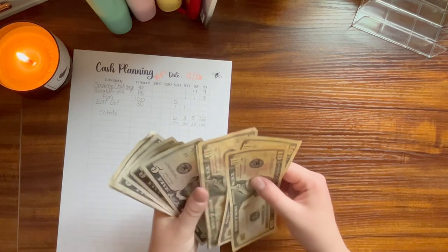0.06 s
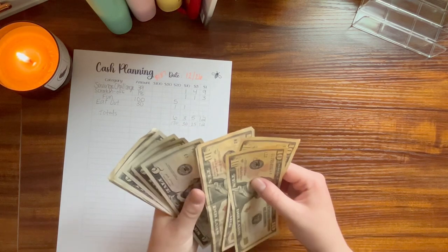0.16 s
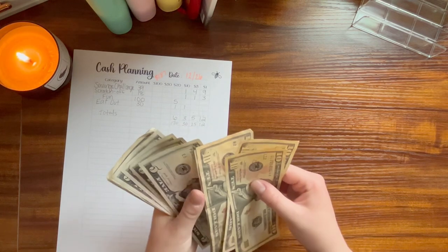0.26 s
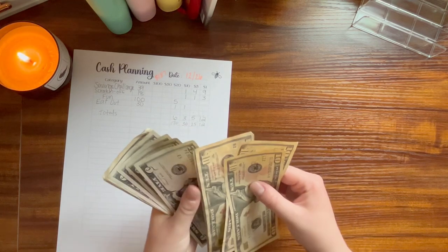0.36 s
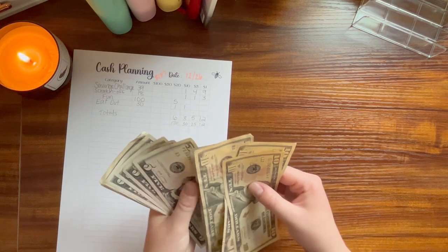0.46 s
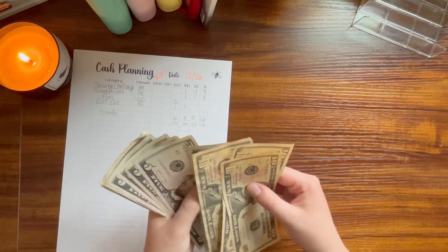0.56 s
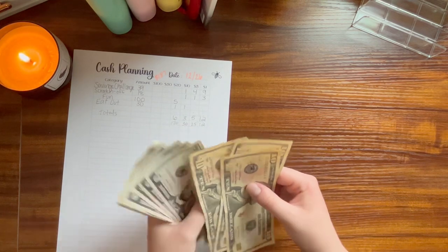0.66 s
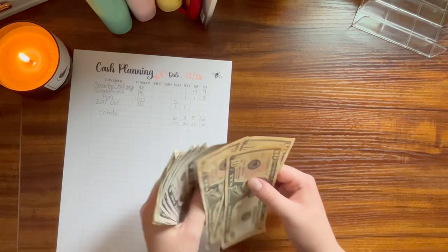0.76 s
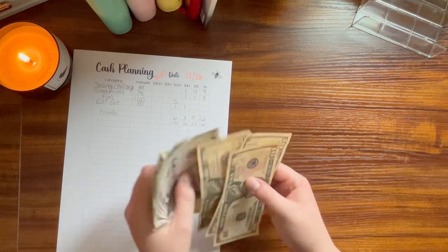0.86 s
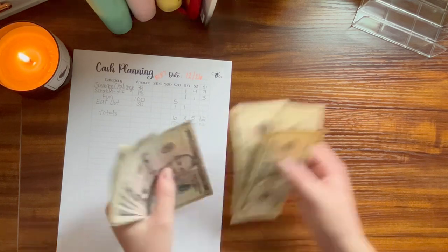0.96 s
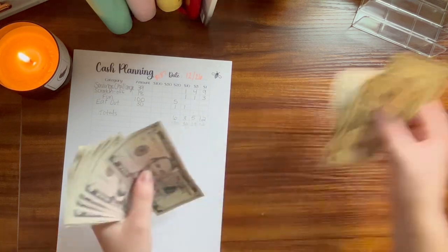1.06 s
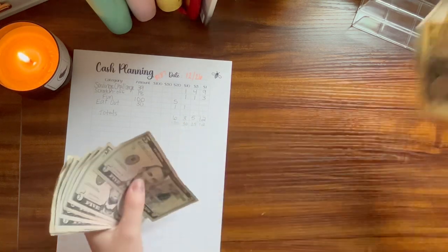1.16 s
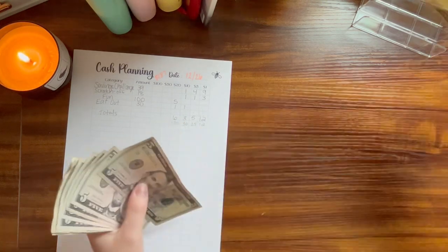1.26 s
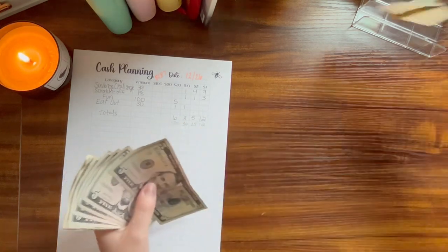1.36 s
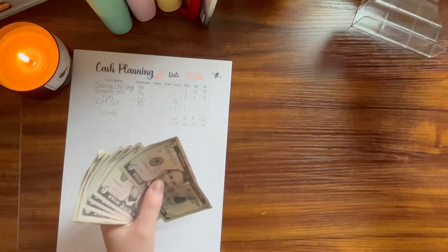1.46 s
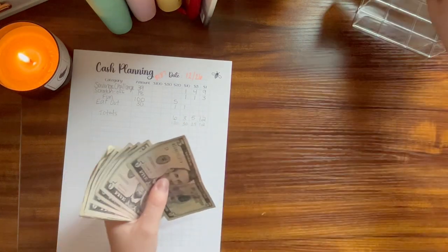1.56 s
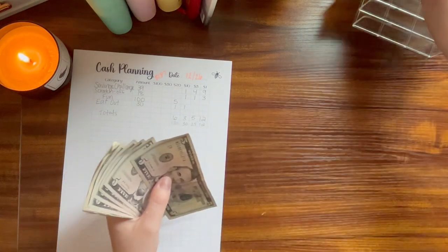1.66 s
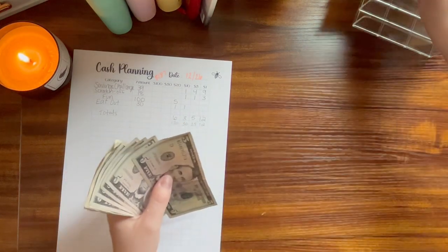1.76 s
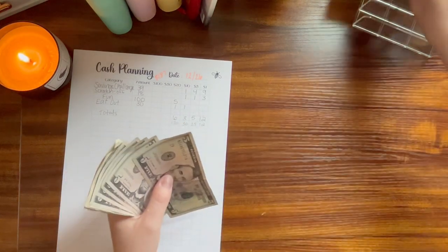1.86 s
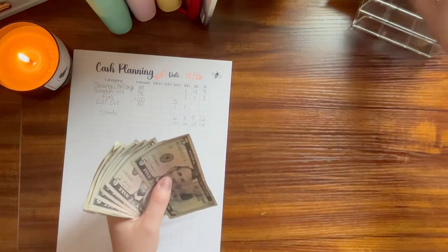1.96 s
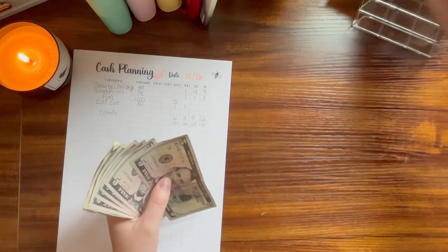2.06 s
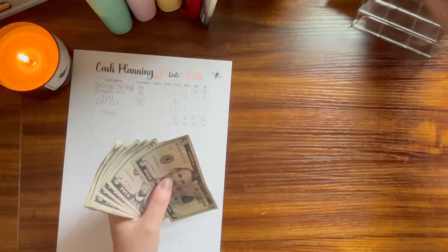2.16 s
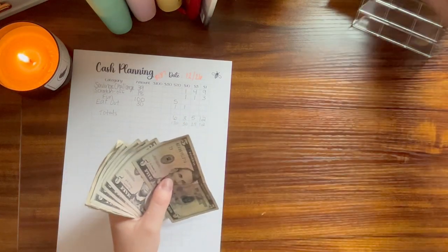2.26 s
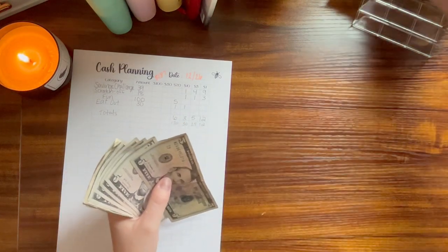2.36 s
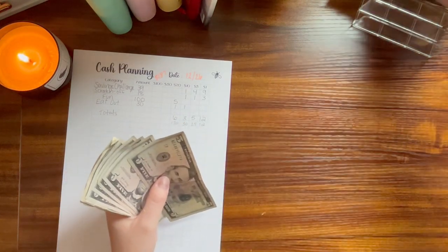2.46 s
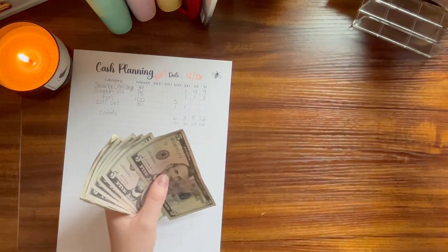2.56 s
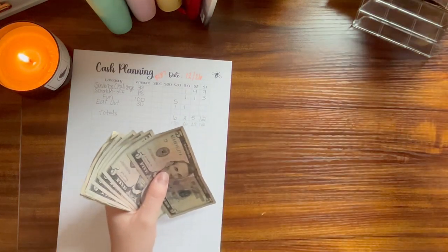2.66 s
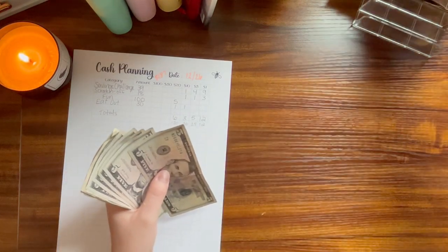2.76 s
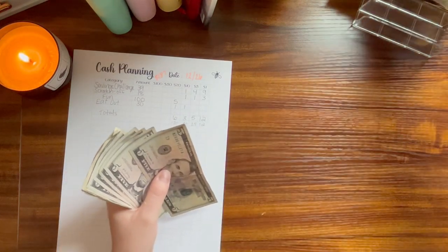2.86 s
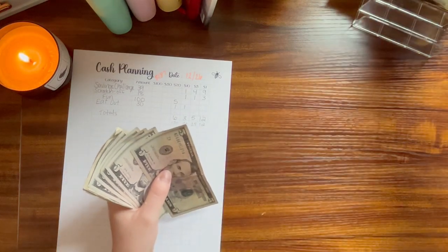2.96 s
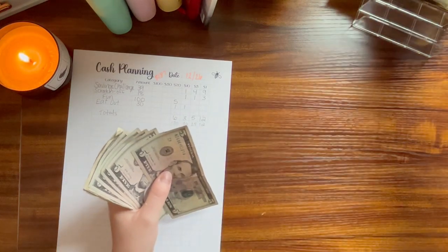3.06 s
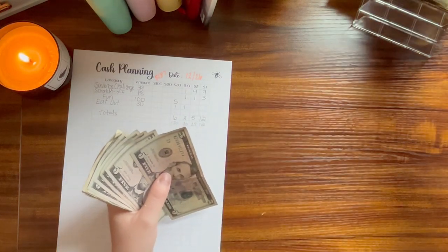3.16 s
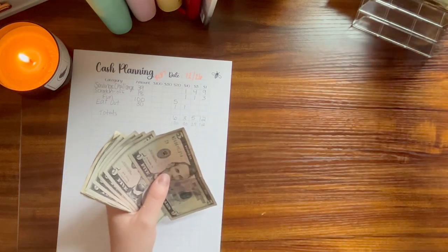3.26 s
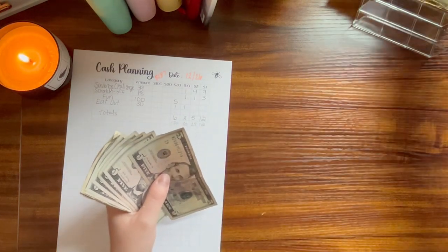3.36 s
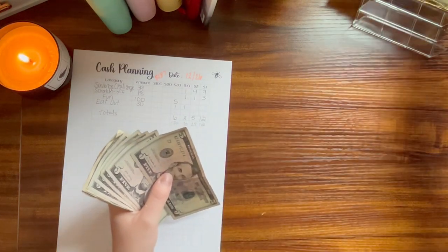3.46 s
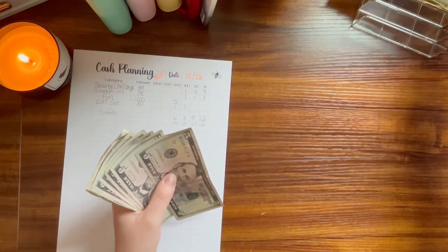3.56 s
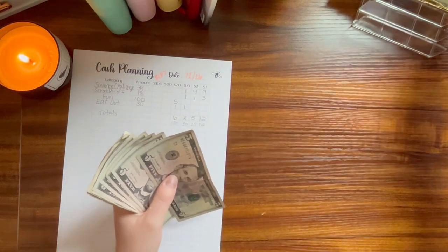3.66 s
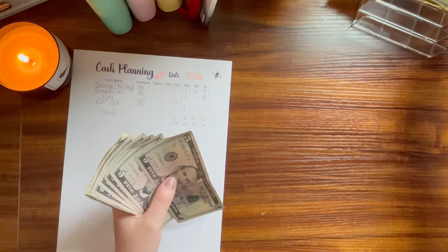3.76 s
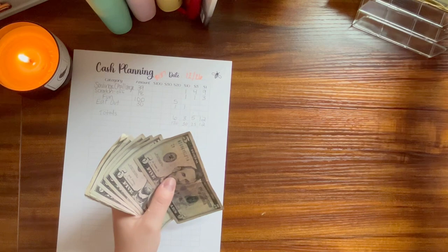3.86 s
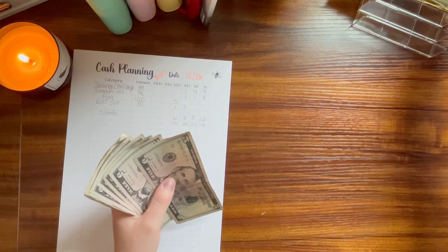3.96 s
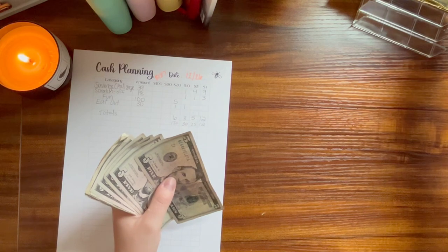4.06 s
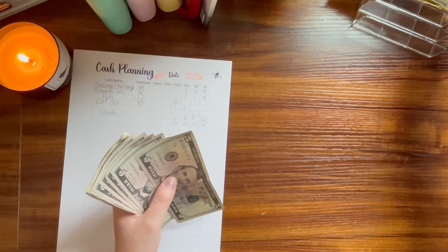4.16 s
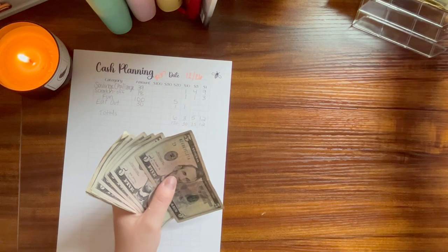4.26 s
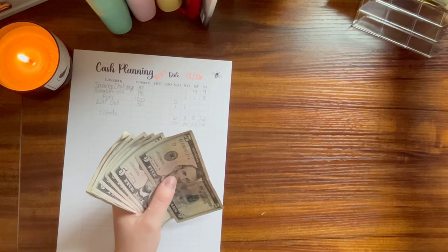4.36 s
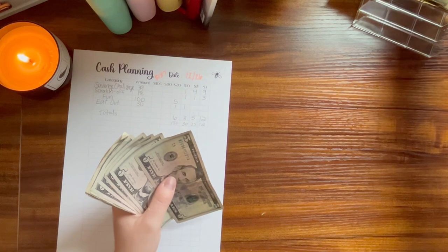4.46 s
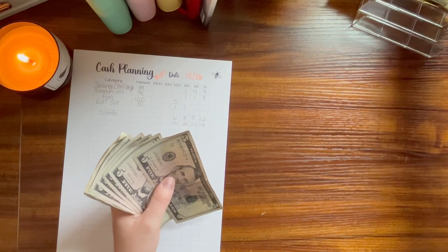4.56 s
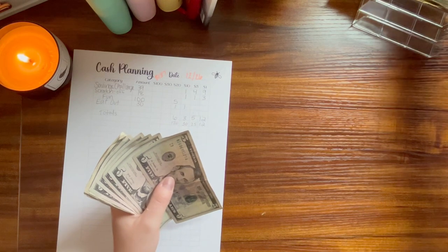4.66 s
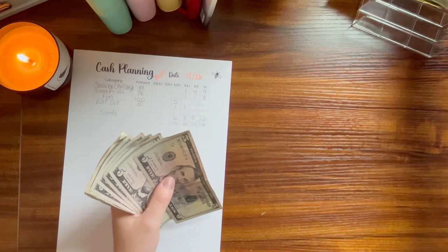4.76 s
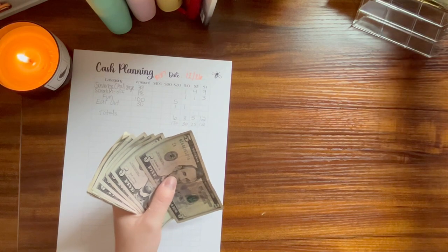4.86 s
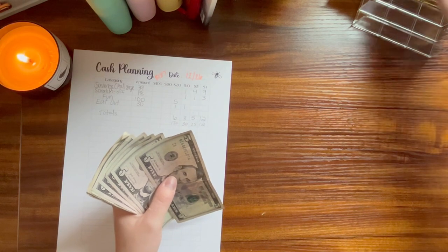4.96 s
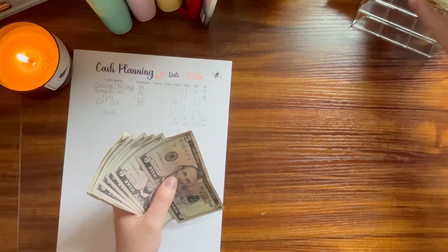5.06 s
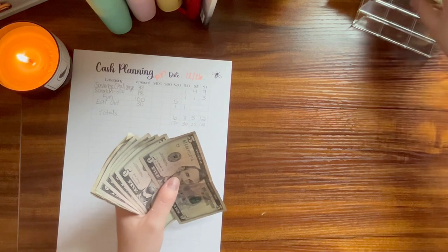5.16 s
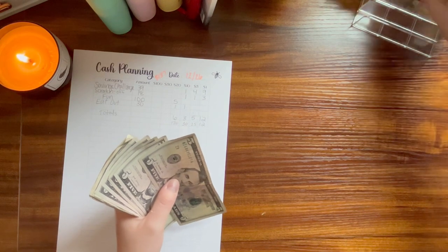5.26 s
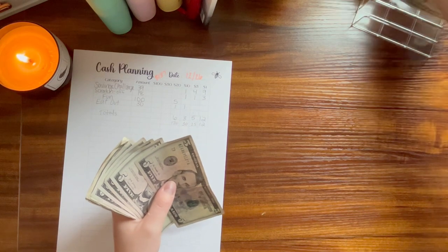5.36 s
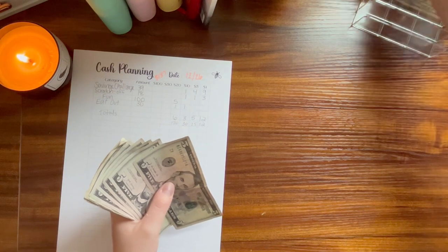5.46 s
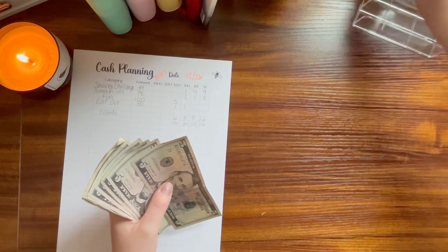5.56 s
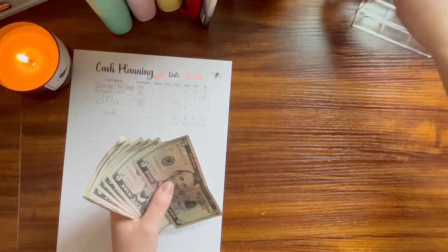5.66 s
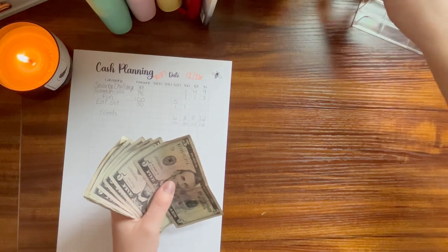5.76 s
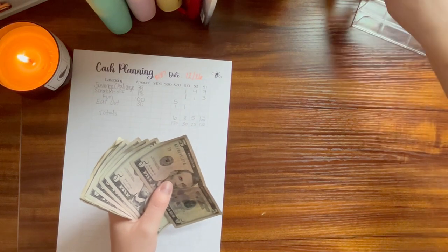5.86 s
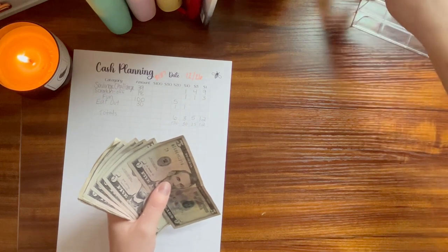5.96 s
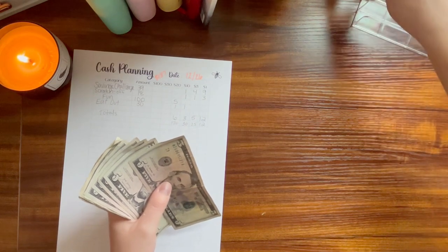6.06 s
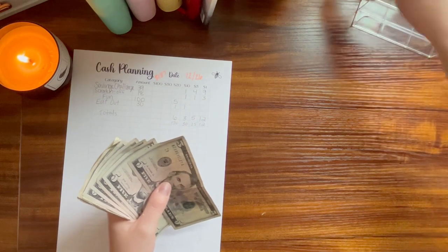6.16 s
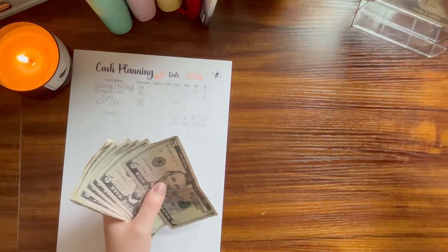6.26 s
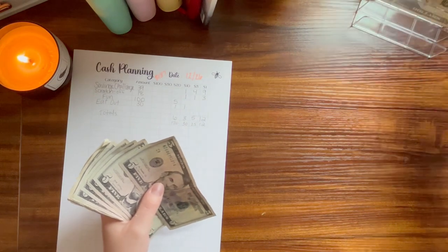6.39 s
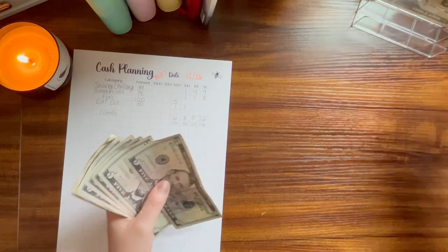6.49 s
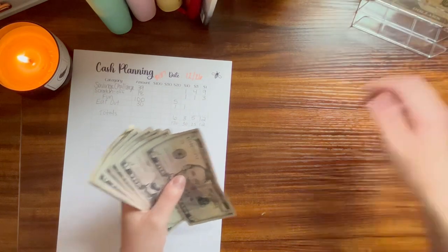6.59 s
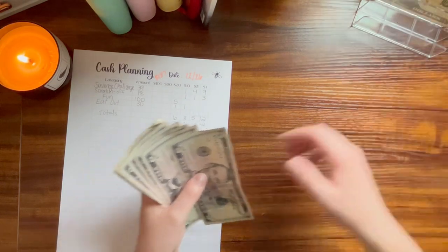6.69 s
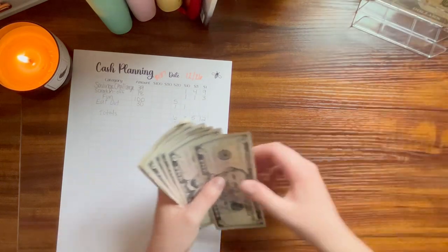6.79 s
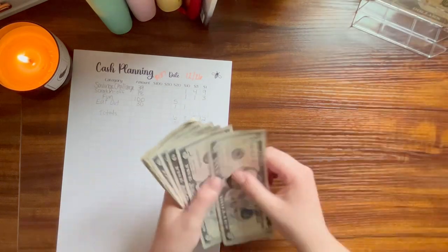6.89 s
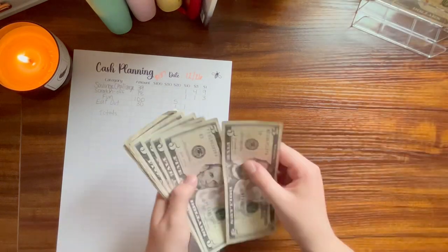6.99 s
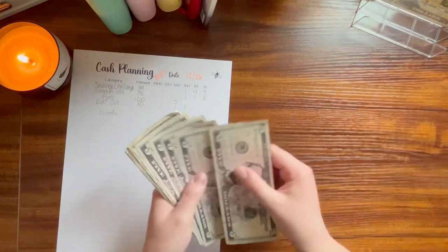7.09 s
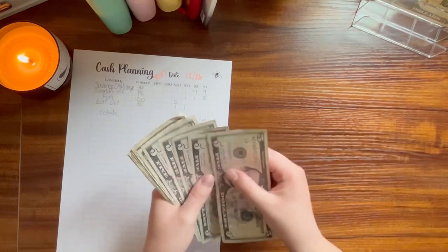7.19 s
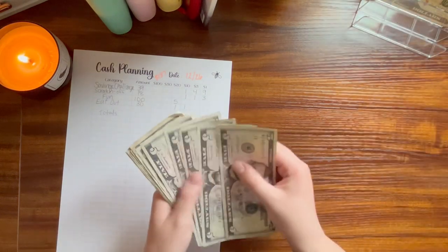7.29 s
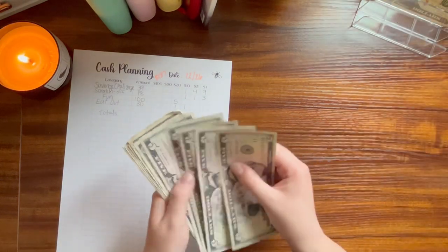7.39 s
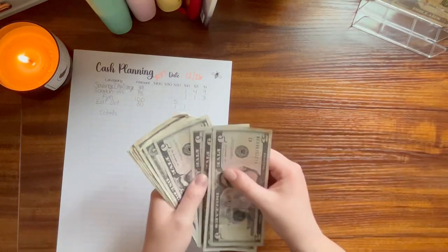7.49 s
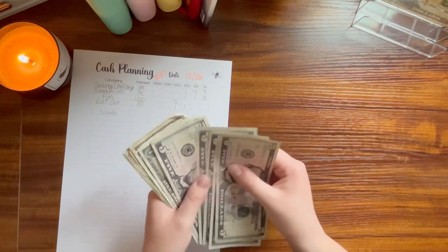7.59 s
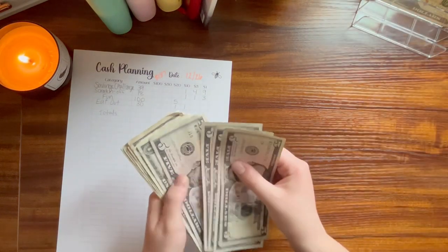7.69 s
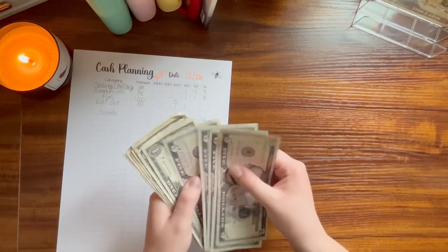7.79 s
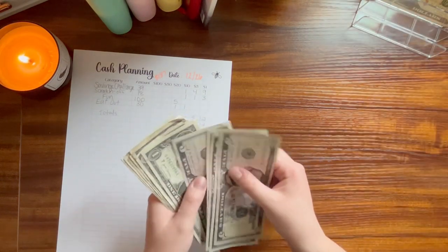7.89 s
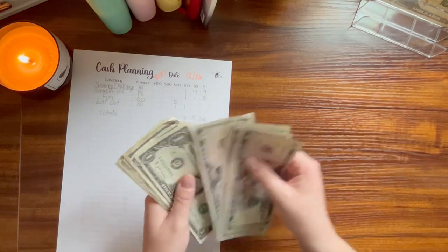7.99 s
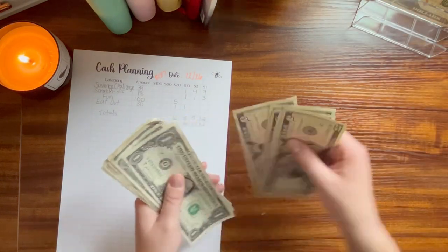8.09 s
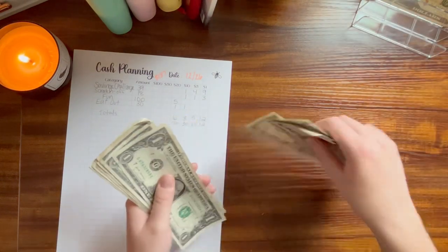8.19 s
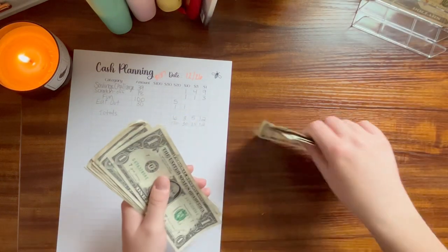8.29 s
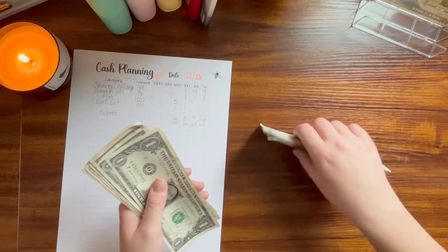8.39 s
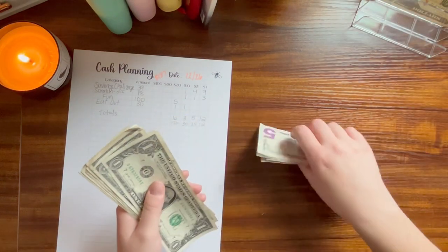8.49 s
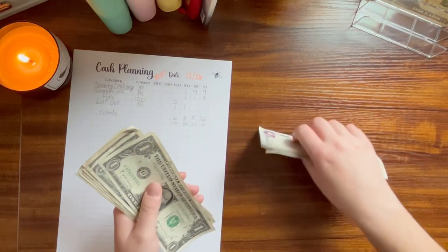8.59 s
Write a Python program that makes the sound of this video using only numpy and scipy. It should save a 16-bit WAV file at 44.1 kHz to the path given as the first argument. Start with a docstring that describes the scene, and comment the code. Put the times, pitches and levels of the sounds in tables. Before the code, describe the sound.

Close crisp shuffling of banknotes, hard plastic tray knocks with faint papery brushing, then louder note pulls and a sharp double tap on wood.

```python
"""In a small, humming room, banknotes are fanned and pulled apart over a wooden desk: fibres catch and slip.
One hand then files some in a clear plastic tray, whose walls ring as it clacks down and scrapes the desk.
A few more notes are drawn with snaps and soft bumps, and their edges are tapped square on the ringing wood.
A close pair of microphone ports listens, a little stronger on the left; dull air noise runs throughout."""
import sys
import numpy as np
from scipy import signal
from scipy.fft import rfft, irfft, next_fast_len
from scipy.io import wavfile
from scipy.ndimage import uniform_filter1d, map_coordinates

SR = 44100
rng = np.random.default_rng(int(sys.argv[2]) if len(sys.argv) > 2 else 0)


def master_out(mix):
    """Clip the mix to full scale and print it as 16-bit PCM to the path in sys.argv[1]."""
    frames = np.transpose(np.atleast_2d(mix))
    ceiling = np.clip(frames, -1, 1)
    pcm = np.round(ceiling * 32767).astype(np.int16)
    wavfile.write(sys.argv[1], SR, pcm)


N = 380583
TIME = np.arange(N) / SR
SHORT = TIME[:SR // 2]  # time axis of one brief contact [s]

# Dull air of the room: (frequency [Hz], relative density [dB per Hz])
AIR_SPECTRUM = [(22, -18), (38, 0.5), (90, -0.5), (170, -4), (330, -9), (620, -8.5), (900, -18),
                (1700, -19.5), (2800, -37.5), (5000, -43), (9000, -49), (14000, -51)]
# Steady hum: (frequency [Hz], level [dB])
HUM_TONES = [(59.5, -72), (119, -65.5), (241, -66.5), (360.5, -76), (420, -76.5), (620, -75), (721, -87)]
# Decay of the room: (frequency [Hz], t60 [s])
ROOM_DECAY = [(150, 0.47), (500, 0.16), (1500, 0.19), (3200, 0.19), (7000, 0.18), (14000, 0.11)]

# Likeness of the two ports: (frequency [Hz], coherence [0-1])
PORT_LIKENESS = [(60, .98), (250, .8), (600, .64), (1300, .58), (2100, .7), (3800, .6), (5400, .25),
                 (7000, .85), (10000, .97), (15000, .9)]
# Phase by which the left port leads: (frequency [Hz], lead [rad])
PORT_LEAD = [(300, 0), (650, .3), (1300, -.4), (2000, 0), (3300, .9), (5000, .6), (7400, -.1), (8400, -1.2),
             (9200, -3), (10700, -3.3), (11800, -6), (13700, -6.5), (15100, -9)]
TOP_HZ = 15400  # top of the audible band here

# Ringing of the tray: (frequency [Hz], width [Hz], relative level [dB])
TRAY_MODES = [(1070, 30, 1), (1137, 30, 2.5), (1424, 30, 2), (1830, 35, 2), (1910, 30, -1), (2175, 30, 0),
              (2295, 30, -1), (2640, 22, 2), (2775, 11, 2), (2990, 35, -1), (3290, 25, 1), (3540, 18, 3),
              (3750, 20, -1), (4110, 22, 0)]
# Tray's foot slips on the desk: (start [s], length [s], chirp level [dB], rumble level [dB])
FOOT_SCRAPES = [(3.0997, 0.0079, -46, -58), (3.114, 0.05, -50, -55.5)]
FOOT_HZ, FOOT_OCTAVES = 3470, .065
# Tray lands on the desk: (time [s], level [dB], clack centre [Hz], thud [dB rel.], hard edge [dB rel.],
# first touch [dB rel.], delay of first rebound [s])
TRAY_LANDINGS = [(1.8954, -25.5, 1300, -11, -10, -7, 0.015), (2.008, -52.5, 1540, -10, -20, -15, 0.0015),
                 (3.1024, -40, 1750, 1, -17, -24, 0.011), (3.148, -48.5, 3400, 4, -4, -0.5, 0.0054),
                 (4.814, -57, 2380, 5, -2, -11, 0.0026), (5.373, -55.5, 2500, 4, -9, -20, 0.0035),
                 (5.442, -29, 2630, -9.5, -8.5, -15.5, 0.0036)]
# Desk under a tray landing or scrape: (frequency [Hz], relative density [dB per Hz])
THUD_SPECTRUM = [(50, -28), (150, 0.5), (350, -3), (650, 2), (1300, -11), (4000, -31)]
CLACK_OCTAVES, CLACK_ATTACK_S, CLACK_T60_S = 0.88, 0.00021, 0.019
TOUCH_S, TOUCH_ATTACK_S, TOUCH_T60_S = .0075, 0.00212, 0.09  # a corner drags on the wood before the blow
TRAY_LOW_HZ = 500  # the small walls radiate little below this
STRIKE_SPREAD_DB = 3  # scatter of the tray modes between contacts
REBOUND_LOSS_DB, REBOUND_SHRINK = 4.5, 0.62  # each rebound is weaker and sooner
REBOUND_HZ, REBOUND_OCTAVES = 2760, 0.77  # light rebounds ring mostly the stiff walls

# Notes leafed through at the tray: (start [s], length [s], level [dB], wall ring [dB rel.], crumpling [dB rel.])
TRAY_SLIDES = [(1.187, 0.31, -74, -5, 2), (1.751, 0.081, -64, -20, 1.5), (1.974, 0.05, -64.5, -9, -10),
               (2.198, 0.12, -63, -22, -4), (2.315, 0.067, -68.5, -7, -5), (2.63, 0.16, -81, -5, -2),
               (2.772, 0.079, -66.5, -2.5, -3), (2.838, 0.17, -74.5, -10, 2), (3.004, 0.075, -68, -6, -9),
               (3.571, .11, -64, -7.5, -20), (3.774, 0.16, -71, -9.5, -16), (4.013, 0.068, -69, -6, -12),
               (4.645, 0.14, -75.5, -5, -8), (5.174, 0.16, -66.5, -36, -4), (5.31, 0.34, -80, -10, 2),
               (5.79, 0.1, -66, -7, -9.5), (6.045, 0.036, -77, -16, -6)]
STROKE_SKEW = 0.82  # under 1, a stroke presses hardest before its middle
CRUMPLE_HZ, CRUMPLE_OCTAVES = 1780, 0.74  # colour of a bending wad
WALL_HZ, WALL_OCTAVES = 3367, 0.042  # narrow colour of a rubbed tray wall

# Edges of the bundle land on the desk: (time [s], level [dB], wood [dB rel.])
EDGE_TAPS = [(8.2996, -46, -14), (8.305, -45.5, 5), (8.32, -38, 6.5), (8.3239, -30.5, -2),
             (8.342, -32, -4.5), (8.362, -16, -5.5), (8.368, -17, -6), (8.3719, -32, -5),
             (8.423, -55, 19.5)]
# Ringing of the desk top: (frequency [Hz], width [Hz], relative level [dB])
DESK_MODES = [(233, 30, 3), (316, 25, 3), (500, 70, 0), (622, 50, 2), (805, 45, -2), (1280, 80, -3),
              (1417, 60, -2), (1950, 60, -1), (2580, 50, 0)]
# Slap of note edges: (frequency [Hz], relative density [dB per Hz])
EDGE_SPECTRUM = [(100, -20), (500, -5), (900, -2), (1400, -10), (3500, 0), (5200, -5), (7700, -3),
                 (10000, -2), (13500, -8), (15500, -13.5)]
# Struck wood without its modes: (frequency [Hz], relative density [dB per Hz])
WOOD_SPECTRUM = [(50, -9), (150, -2), (300, -5.5), (600, -2), (1400, 2.5), (2800, -3.5), (6000, -8)]

# Fingers and the wad bump softly: (start [s], length [s], level [dB], colour centre [Hz])
SOFT_BUMPS = [(0.894, 0.012, -47, 450), (1.078, .036, -53.5, 244), (1.14, 0.26, -58.5, 105),
              (2.378, 0.63, -61.5, 65), (6.868, 0.034, -56.5, 564), (7.004, 0.058, -58.5, 610),
              (7.197, 0.018, -56, 885), (7.419, 0.025, -54, 506)]
# A finger knocks the stiff wad: (time [s], level [dB], pitch [Hz], t60 [s])
WAD_KNOCKS = [(.897, -35, 1450, 0.017), (1.0915, -49, 1360, 0.012), (6.882, -44, 950, .01),
              (7.1795, -36, 620, 0.009)]
# A note buckles or flicks off a finger: (time [s], level [dB], colour centre [Hz])
NOTE_SNAPS = [(.108, -57, 7460), (0.509, -47, 4000), (.749, -46.5, 1786), (0.8961, -43, 1860),
              (.971, -33, 6800), (1.091, -39, 1400), (2.229, -59, 3500), (2.264, -47, 3000),
              (2.459, -53.5, 7960), (2.788, -50.5, 6500), (2.891, -47.5, 8500), (4.831, -46, 6500),
              (5.238, -46, 8000), (5.263, -53, 2500), (5.316, -60, 1500), (6.88, -50.5, 1800),
              (7.011, -37.5, 2010), (7.1795, -46, 1300), (7.202, -56.5, 11000), (7.425, -42.5, 2700),
              (7.563, -44.5, 3430), (7.99, -37, 2460)]
SNAP_OCTAVES = 1  # width of a snap's colour

# Notes pulled over each other in the hands: (time of fastest slip [s], speeding up [s], slowing down [s],
# level [dB], crispness of the top treble [dB])
NOTE_PULLS = [(.005, 0.064, 0.29, -60.5, -1.5), (.178, 0.033, 0.078, -65.5, -13),
              (.295, 0.15, 0.39, -67, -8), (0.516, 0.042, 0.61, -54, -4), (.672, 0.039, 0.22, -56.5, -5),
              (.91, 0.08, 0.087, -61, -2), (1.025, 0.35, 0.68, -56, -7), (1.34, 0.16, 0.13, -79, 4),
              (6.923, 0.095, 0.16, -47, 0.5), (7.105, 0.29, 0.17, -54, 2.5), (7.325, 0.42, 0.13, -60.5, 4),
              (7.425, 0.06, 0.13, -47, -0.5), (7.6, 0.37, 0.42, -59.5, -1), (7.774, 0.1, 0.14, -49, 0.5),
              (8.0, 0.19, 0.11, -47, 1.5), (8.055, 0.13, 0.09, -53.5, 6), (8.5, 0.21, 0.83, -65.5, -7)]
# Rubbing paper: (frequency [Hz], relative density [dB per Hz])
PAPER_SPECTRUM = [(80, -29.5), (300, 4.5), (600, 2.5), (900, 4), (1400, 0), (2200, 2), (3300, -1.5),
                  (5000, -3), (7500, -1), (10000, -4), (13000, -4), (15500, -1.5)]
PULL_DEPTH_DB = 32.5  # a pull climbs and sinks this far in its two times
PULL_ROUNDING = 1  # 1 is a pointed top, 2 a round one
CRISP_HZ = 8900  # crisp notes hiss more above this than limp ones


def amp(db):
    """Decibels to gain."""
    return 10 ** (np.asarray(db) / 20)


def unit(x):
    """x at rms 1."""
    return x / np.sqrt(np.mean(np.abs(x) ** 2) + 1e-20)


def along(points, hz):
    """(Hz, value) points read on a log axis."""
    f, v = np.transpose(points)
    return np.interp(np.log(hz + 1), np.log(f + 1), v)


def wobble(rate):
    """A smooth random curve, rate knots a second."""
    knots = rng.standard_normal(int(N * rate / SR) + 4)
    return map_coordinates(knots, [TIME * rate])


def shape(points):
    """Gain against frequency from (Hz, dB) points."""
    return lambda hz: amp(along(points, hz))


def hump(centre_hz, octaves):
    """Gain of one broad resonance."""
    return lambda hz: 1 / (1 + (np.log2((hz + 1) / centre_hz) / octaves) ** 2)


def ringing(gain, modes, ring_db):
    """A gain curve with narrow (Hz, width, dB) modes standing out of it."""
    def resonant(hz):
        peaks = sum(amp(db + ring_db) ** 2 / (1 + (2 * (hz - c) / w) ** 2) for c, w, db in modes)
        return gain(hz) * np.sqrt(1 + peaks)
    return resonant


def coloured(x, gain):
    """x through a causal minimum-phase filter that keeps the power of white noise."""
    m = 2 * next_fast_len(x.shape[-1] // 2 + 4096)
    curve = unit(gain(np.fft.rfftfreq(m, 1 / SR)))
    cepstrum = irfft(np.log(curve + 1e-6))
    # folding the cepstrum forward puts the response after its cause
    cepstrum[1:m // 2] *= 2
    cepstrum[m // 2 + 1:] = 0
    response = np.exp(rfft(cepstrum))
    return irfft(rfft(x, m) * response, m)[..., :x.shape[-1]]


def add(out, s, sound):
    """Mix a sound in from second s."""
    part = out[:, max(round(s * SR), 0):][:, :sound.shape[1]]
    part += sound[:, :part.shape[1]]


def room_tail():
    """Two fresh noise tails of the room, each band fading at its own rate."""
    hz, t, z = signal.stft(rng.standard_normal((2, len(SHORT))), SR, nperseg=256)
    fade = amp(-60 * t / along(ROOM_DECAY, hz)[:, None])
    tail = signal.istft(z * fade, SR, nperseg=256)[1][:, :len(SHORT)]
    tail = tail * (1 - np.exp(-SHORT / 0.00042))
    return tail / np.linalg.norm(tail[0])


def contact(t60, wet_db, attack=.00045):
    """A brief noisy crush of materials, mixed with the room."""
    fade = amp(-60 * SHORT / t60) * (1 - np.exp(-SHORT / attack))
    crush = rng.standard_normal((2, len(SHORT))) * fade
    crush = crush / np.linalg.norm(crush, axis=1, keepdims=True)
    return np.linalg.norm(fade) * (crush + amp(wet_db) * room_tail())


def friction(level, slips_per_s, spread_db, flutter_db, wet_db):
    """Surfaces catch and slip: tiny clicks of uneven size under a level curve, with the room."""
    happens = rng.random(N) < slips_per_s / SR
    sizes = happens * amp(spread_db * np.clip(rng.standard_normal(N), -2, 2))
    clicks = rng.standard_normal((2, N)) * sizes * amp(flutter_db * wobble(90))
    slips = level * unit(clicks)
    echo = signal.fftconvolve(slips, room_tail(), axes=1)[:, :N]
    return slips + amp(wet_db) * echo


def crinkles(level, count, centre_hz, cycles, spread_db):
    """Creases flip at random moments; each rings for a few or many cycles at its own pitch."""
    at = rng.integers(0, N - 400, count)
    pitch, size, scatter = rng.standard_normal((3, count))
    hz = np.clip(centre_hz * 2 ** pitch, 500, 14000)[:, None]
    steps = np.arange(400)  # samples kept of each flip
    turns = hz * steps / SR
    strength = amp(spread_db * np.clip(size, -2, 2))[:, None] * np.sqrt(hz)
    grains = strength * np.sin(2 * np.pi * turns) * np.exp(-turns / cycles)

    def place(rows):
        return unit(np.bincount((at[:, None] + steps).ravel(), rows.ravel(), N))
    return level * np.array([place(grains), place(grains * scatter[:, None])])


def stroke(start, length):
    """Pressure of one stroke: a quick swell and a softer release."""
    progress = np.clip((TIME - start) / length, 0, 1)
    return np.abs(np.sin(np.pi * progress ** STROKE_SKEW))


def room_air():
    """Dull ventilation noise, with hum tones that waver slightly in level and phase."""
    air = amp(-60.0) * coloured(rng.standard_normal((2, N)), shape(AIR_SPECTRUM))
    for hz, db in HUM_TONES:
        level = np.sqrt(2) * amp(db + 0.85 * wobble(5.6))
        air[0] += level * np.sin(2 * np.pi * hz * TIME + .5 * wobble(1.98))
    return air


def tray_scrape():
    """The tray is nudged along the desk: its slipping foot chirps while the wood rumbles."""
    out = np.zeros((2, N))
    for s, length, chirp_db, rumble_db in FOOT_SCRAPES:
        slips = friction(stroke(s, length), slips_per_s=2500, spread_db=1.5, flutter_db=1, wet_db=-8)
        slips = slips[:, round(s * SR):][:, :len(SHORT)]
        chirp = coloured(slips, ringing(hump(FOOT_HZ, FOOT_OCTAVES), TRAY_MODES, ring_db=6))
        rumble = coloured(slips, shape(THUD_SPECTRUM))
        add(out, s, amp(chirp_db) * chirp + amp(rumble_db) * rumble)
    return out


def clack(hz, octaves, t60, attack, thud_db, edge_db):
    """One contact rings a fresh mix of plastic modes, thuds in the desk and adds a hard tick."""
    modes = [(c, w, db + STRIKE_SPREAD_DB * rng.standard_normal()) for c, w, db in TRAY_MODES]

    def walls(f):
        return hump(hz, octaves)(f) / np.sqrt(1 + (TRAY_LOW_HZ / (f + 1)) ** 4)
    plastic = coloured(contact(t60, wet_db=-4.5, attack=attack), ringing(walls, modes, ring_db=5))
    thud = coloured(contact(t60=0.0087, wet_db=7.0), shape(THUD_SPECTRUM))
    tick = coloured(contact(t60=0.034, wet_db=-5.0), hump(centre_hz=9300, octaves=0.39))
    return plastic + amp(thud_db) * thud + amp(edge_db) * tick


def tray_clacks():
    """The tray touches with one corner, lands, and rocks to rest in two rebounds."""
    out = np.zeros((2, N))
    for s, db, hz, thud_db, edge_db, touch_db, rebound_s in TRAY_LANDINGS:
        touch = clack(hz, CLACK_OCTAVES, TOUCH_T60_S, TOUCH_ATTACK_S, thud_db=-37, edge_db=-26)
        add(out, s - TOUCH_S, amp(db + touch_db) * touch)
        landing = clack(hz, CLACK_OCTAVES, CLACK_T60_S, CLACK_ATTACK_S, thud_db, edge_db)
        add(out, s, amp(db) * landing)
        delays = [rebound_s, rebound_s * (1 + REBOUND_SHRINK)]
        for k, delay in enumerate(delays, 1):
            rebound = clack(REBOUND_HZ, REBOUND_OCTAVES, CLACK_T60_S, CLACK_ATTACK_S, thud_db, edge_db)
            add(out, s + delay, amp(db - REBOUND_LOSS_DB * k) * rebound)
    return out


def tray_notes():
    """Notes brush each other and the tray, which colours them; bent, they crumple; pressed, a wall sings."""
    level, pressed, bent = 0, 0, 0
    for s, length, db, wall_db, crumple_db in TRAY_SLIDES:
        pressure = stroke(s, length)
        level = level + amp(db) * pressure
        pressed = pressed + amp(db + wall_db) * pressure
        bent = bent + amp(db + crumple_db) * pressure
    slips = friction(level, slips_per_s=2500, spread_db=0, flutter_db=2.5, wet_db=-4.0)
    slips = slips + amp(-21) * crinkles(level, count=3000, centre_hz=3460, cycles=42.0, spread_db=3.0)
    folds = friction(bent, slips_per_s=760, spread_db=-1, flutter_db=6, wet_db=-8)
    folds = coloured(folds, hump(CRUMPLE_HZ, CRUMPLE_OCTAVES))
    wall = friction(pressed, slips_per_s=3500, spread_db=-2.5, flutter_db=5.5, wet_db=-26.0)
    wall = coloured(wall, hump(WALL_HZ, WALL_OCTAVES))
    return wall + coloured(slips + folds, ringing(np.ones_like, TRAY_MODES, ring_db=4.5))


def desk_taps():
    """The notes land a few at a time: a crisp slap of edges, and the desk top answers."""
    out = np.zeros((2, N))
    for s, db, wood_db in EDGE_TAPS:
        slap = coloured(contact(t60=0.021, wet_db=-6.0), shape(EDGE_SPECTRUM))
        desk_top = ringing(shape(WOOD_SPECTRUM), DESK_MODES, ring_db=17.0)
        wood = coloured(contact(t60=0.019, wet_db=-2), desk_top)
        add(out, s, amp(db) * (slap + amp(wood_db) * wood))
    return out


def bumps():
    """Fingers take hold of the wad, and the swung notes push a puff of air: swells of low noise."""
    out = np.zeros((2, N))
    for s, length, db, hz in SOFT_BUMPS:
        swell = np.sin(np.pi * np.minimum(SHORT / length, 1)) ** .5
        push = swell * rng.standard_normal((2, len(SHORT)))
        body = lambda f: hump(hz, octaves=1.3)(f) ** 2  # soft contact has little treble
        add(out, s, amp(db) * coloured(push, body))
    return out


def knocks():
    """The knocked wad rings for a few cycles: short pitched tocks with a little room."""
    out = np.zeros((2, N))
    for s, db, hz, t60 in WAD_KNOCKS:
        fade = amp(db - 60 * SHORT / t60) * (1 - np.exp(-SHORT / 0.0001))
        tock = fade * np.sin(2 * np.pi * hz * SHORT)
        echo = signal.fftconvolve(tock[None], room_tail(), axes=1)[:, :len(SHORT)]
        add(out, s, np.array([tock, 0 * tock]) + amp(-17) * echo)
    return out


def snaps():
    """Stiff paper pops through: large buckles are low, flicked edges high."""
    out = np.zeros((2, N))
    for s, db, hz in NOTE_SNAPS:
        pop = contact(t60=.011, wet_db=-12)
        add(out, s, amp(db) * coloured(pop, hump(hz, SNAP_OCTAVES)))
    return out


def pull(s, rise, fall):
    """Gain of one pull: the notes speed up until second s, then slow down."""
    away = np.maximum((s - TIME) / rise, (TIME - s) / fall)
    return amp(-PULL_DEPTH_DB * np.minimum(away, 10) ** PULL_ROUNDING)


def flexing(x, patchy_db):
    """The sheets bend as they slide, so their colour drifts in broad patches."""
    z = signal.stft(x, nperseg=512)[2]
    field = uniform_filter1d(rng.standard_normal(z.shape[1:]), size=9, axis=0)  # across frequency
    field = uniform_filter1d(field, size=8, axis=1)  # across time
    patches = unit(amp(patchy_db * unit(field)))
    return signal.istft(z * patches, nperseg=512)[1][:, :N]


def hand_notes():
    """Notes slide over each other, crinkle and crackle; overlapping pulls add in power."""
    powers = [(amp(db) * pull(s, rise, fall)) ** 2 for s, rise, fall, db, crisp_db in NOTE_PULLS]
    total = sum(powers)
    level = np.sqrt(total)
    # the strongest pull of the moment weighs most in the treble
    crispness = sum(power * amp(row[-1]) for power, row in zip(powers, NOTE_PULLS)) / total
    hiss = friction(level, slips_per_s=10000, spread_db=0.5, flutter_db=1.4, wet_db=-5.0)
    hiss = coloured(hiss, shape(PAPER_SPECTRUM))
    top = signal.sosfiltfilt(signal.butter(2, CRISP_HZ, "high", fs=SR, output="sos"), hiss)
    fine = amp(-13) * crinkles(level, count=2600, centre_hz=3300, cycles=4, spread_db=3)
    crackle = amp(-11.5) * crinkles(level, count=480, centre_hz=3200, cycles=1.2, spread_db=3.5)
    return flexing(hiss + (crispness - 1) * top, patchy_db=2) + fine + crackle


def ports(pair):
    """Row 0 reaches both ports alike, row 1 with opposite sign; a phase lead sets the lag between them."""
    m = next_fast_len(N + SR // 2)
    hz = np.fft.rfftfreq(m, 1 / SR)
    turn = np.arccos(np.clip(along(PORT_LIKENESS, hz), 0, 1)) / 2
    common, diffuse = rfft(pair, m) * [np.cos(turn), np.sin(turn)]
    lead = np.exp(.5j * along(PORT_LEAD, hz))  # half the lead on each port
    left = (common + diffuse) * lead
    right = (common - diffuse) / lead
    return irfft(np.array([left, right]), m)[:, :N]


def scene():
    """Room, tray, desk and notes at the close pair, a little stronger on the left."""
    tray = tray_scrape() + tray_clacks() + tray_notes()
    notes = desk_taps() + bumps() + knocks() + snaps() + hand_notes()
    return ports(room_air() + tray + notes) * amp([[.7], [-.7]])


def record(dry):
    """A very steep low-pass leaves next to nothing above TOP_HZ."""
    m = next_fast_len(N + SR // 2)
    hz = np.fft.rfftfreq(m, 1 / SR)
    return irfft(rfft(dry, m) / np.sqrt(1 + (hz / TOP_HZ) ** 120), m)[:, :N]


dry = scene()
out = record(dry)
master_out(out)
```